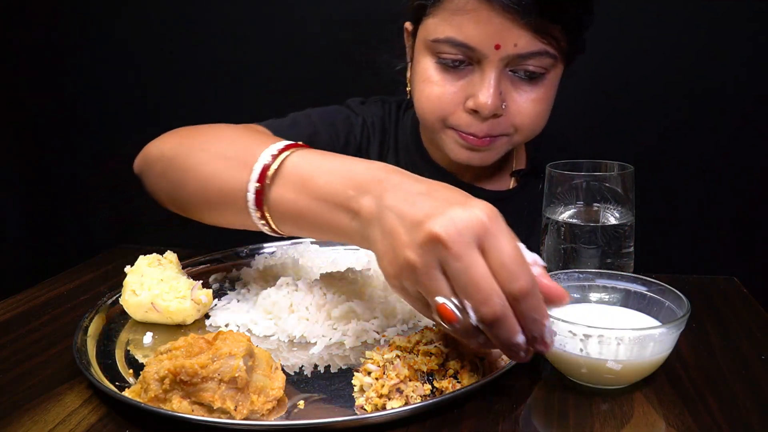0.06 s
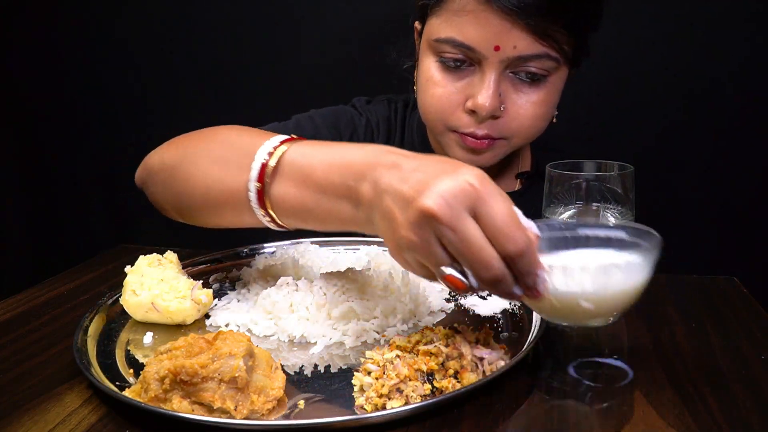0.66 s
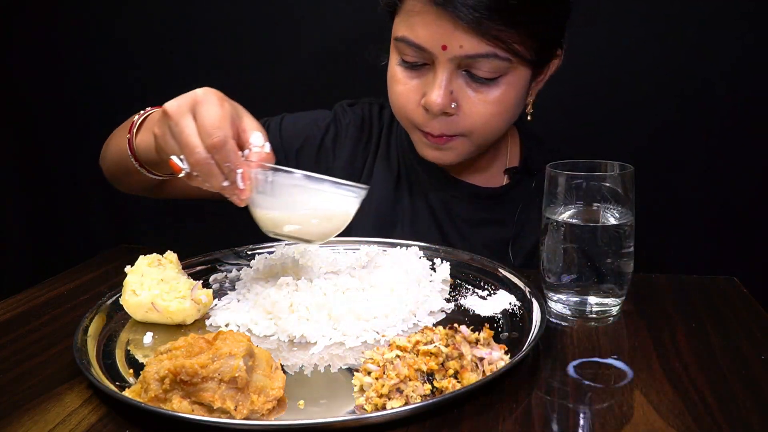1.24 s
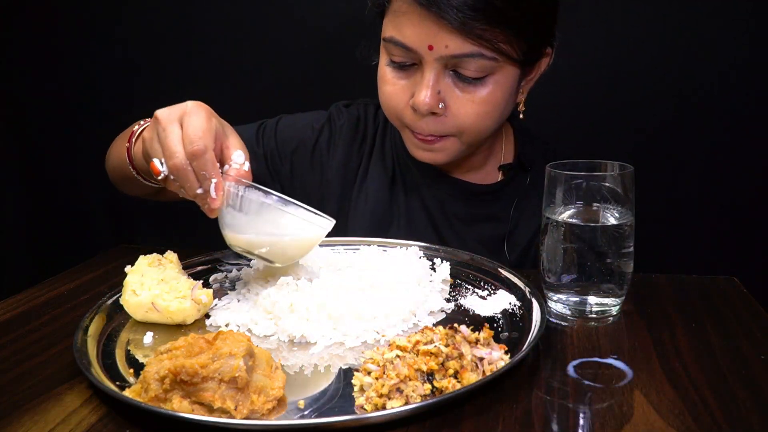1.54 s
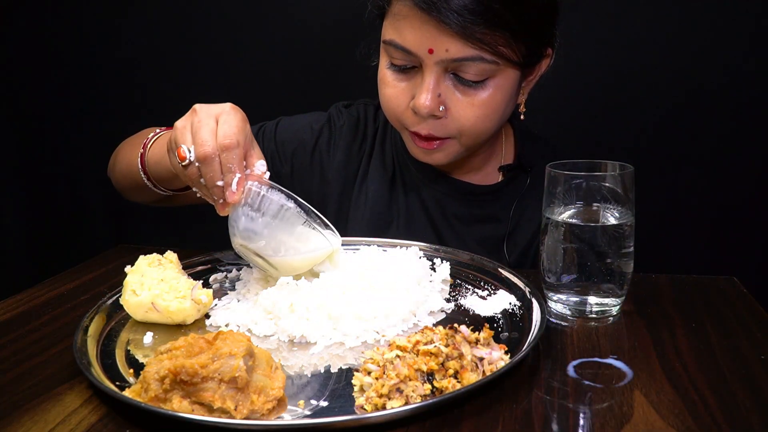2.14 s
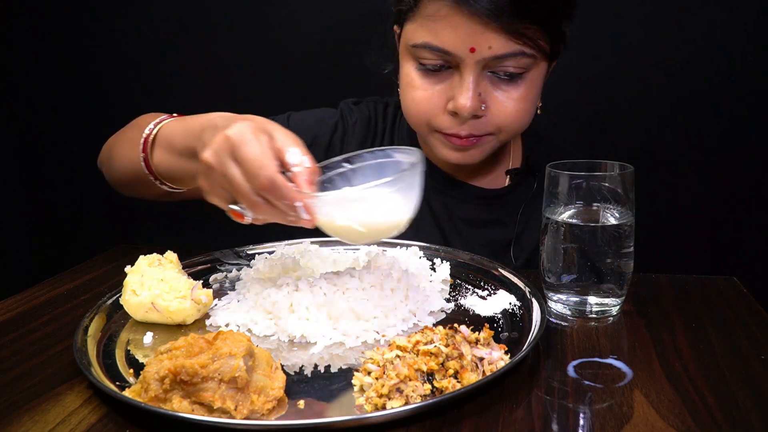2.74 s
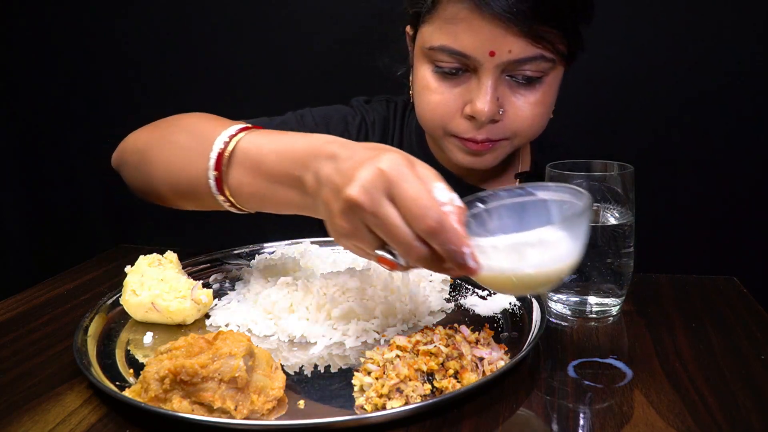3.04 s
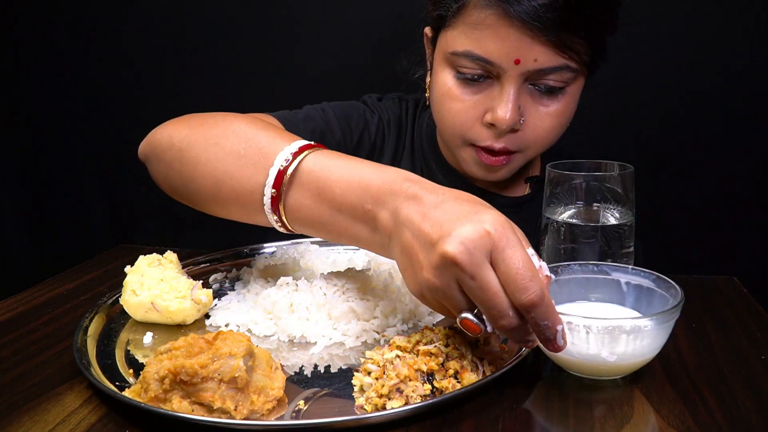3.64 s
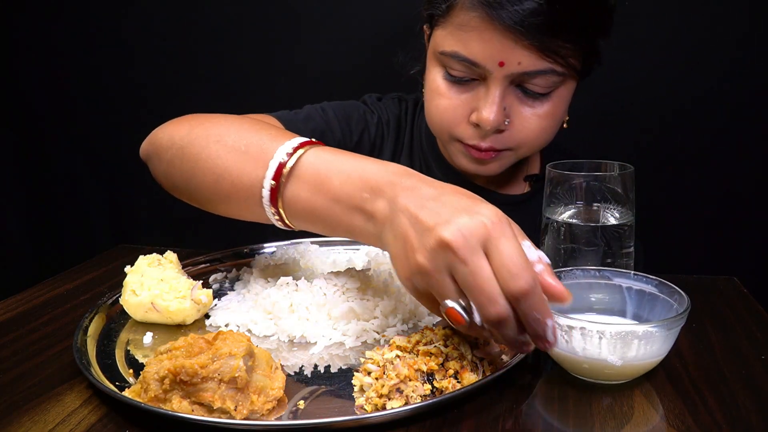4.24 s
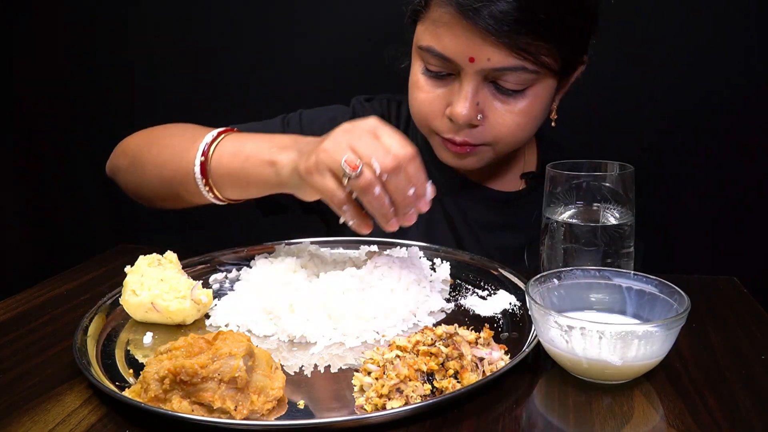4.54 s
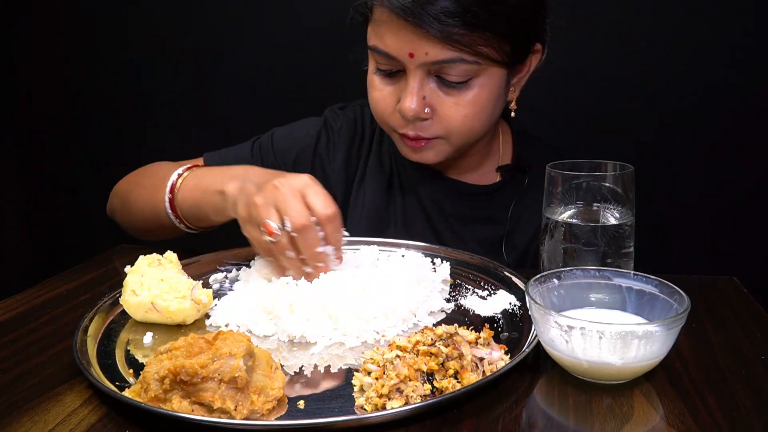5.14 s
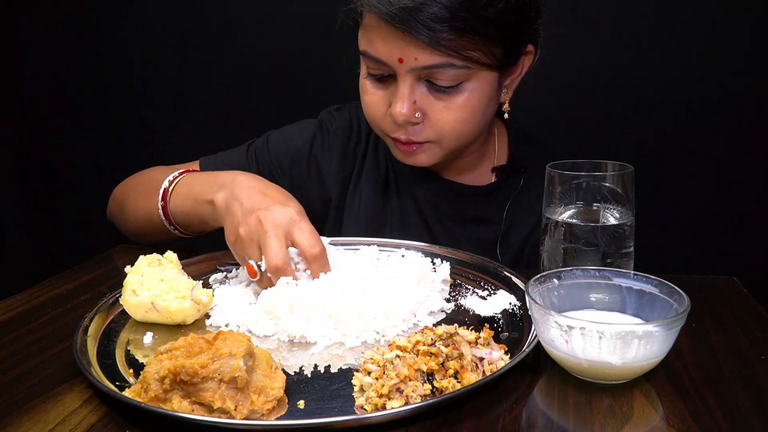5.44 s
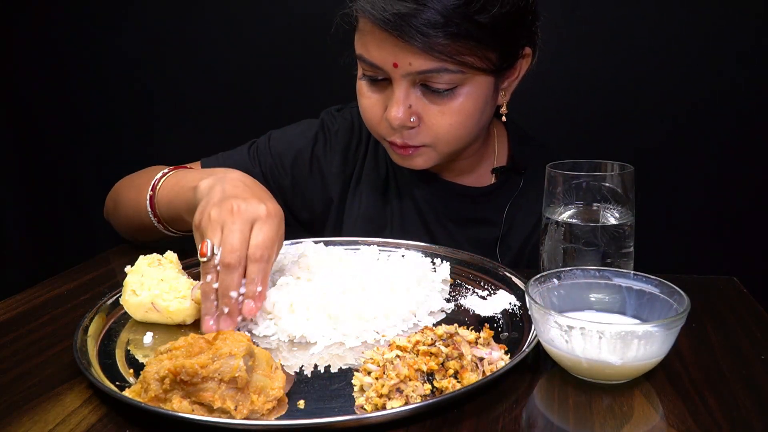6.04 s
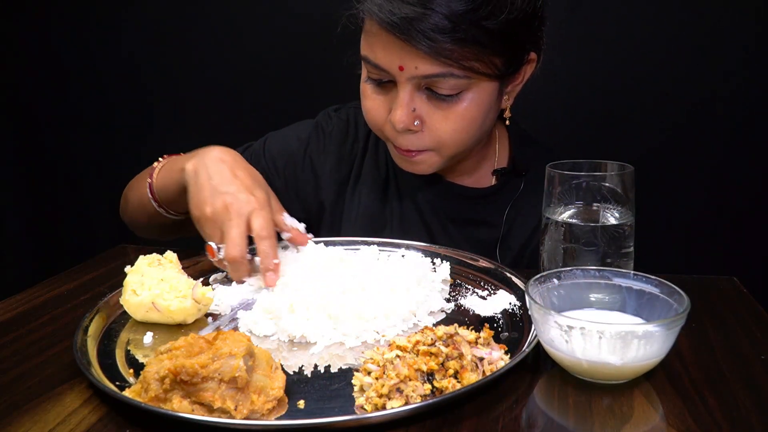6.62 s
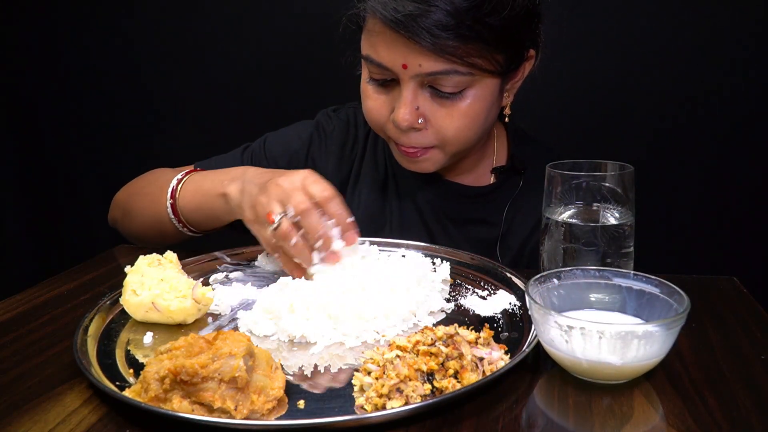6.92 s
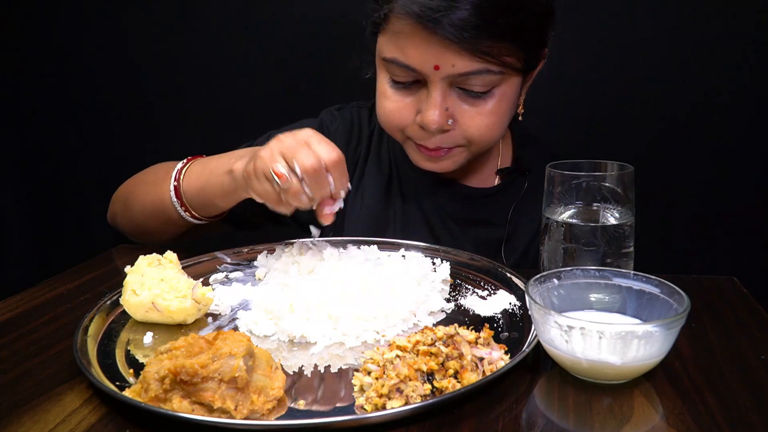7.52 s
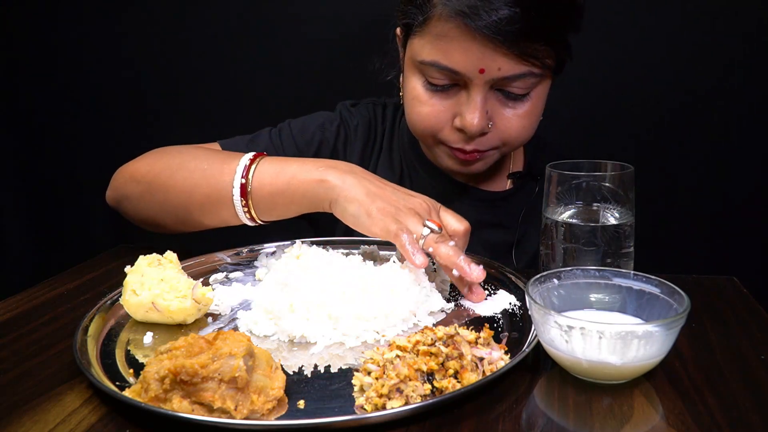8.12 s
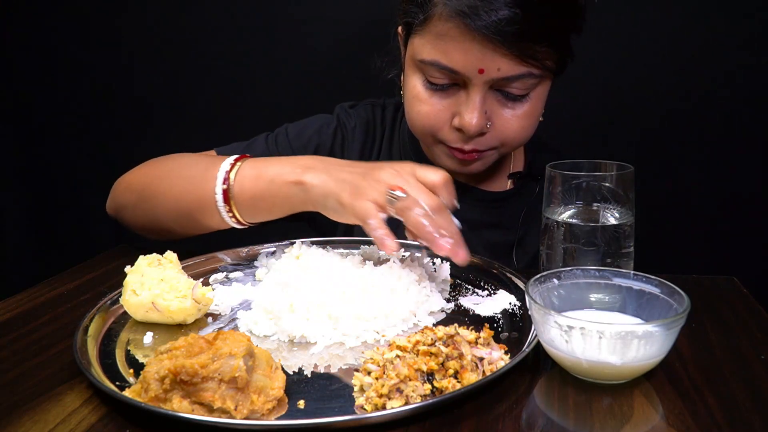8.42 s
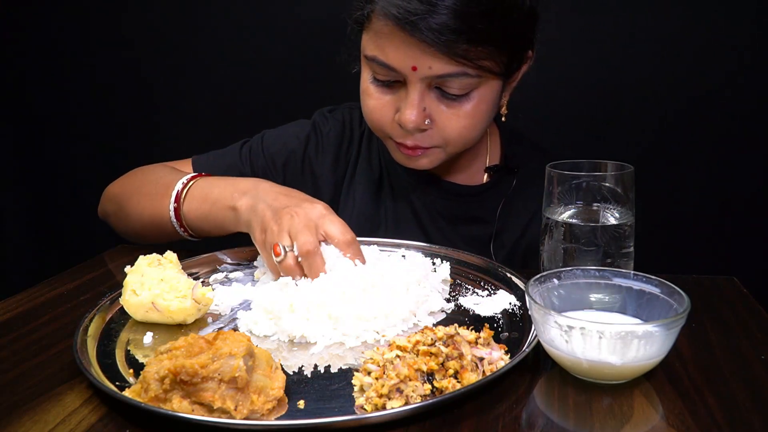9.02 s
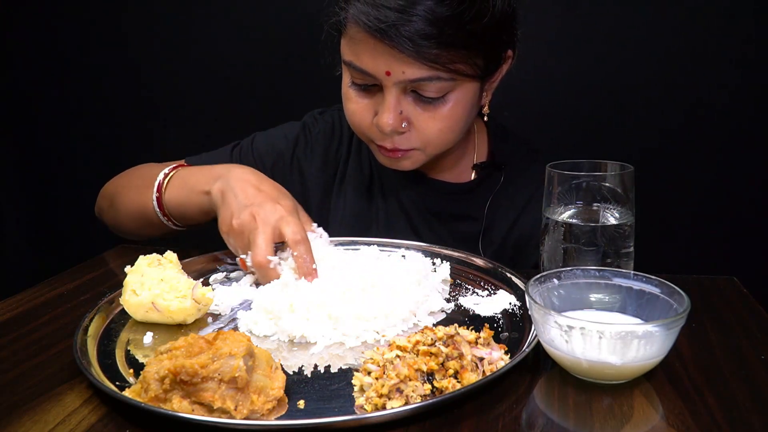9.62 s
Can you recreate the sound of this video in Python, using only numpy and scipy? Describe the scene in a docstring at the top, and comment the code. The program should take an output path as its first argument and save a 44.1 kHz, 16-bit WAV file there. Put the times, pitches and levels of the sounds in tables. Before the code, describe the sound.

A steady low motor hum fills a small room, heard through one close microphone. In the first second there are a few soft bumps and scuffs as a glass bowl is picked up from a wooden table. From about 1.8 to 2.8 seconds, milk drips onto boiled rice with small wet pops and one dull bump. At 3.4 seconds the bowl lands on the table with a sharp, briefly ringing knock, the loudest sound. It slides with a faint squeak and settles with duller knocks around 3.9 to 4.1 seconds. From about 4.9 seconds until nearly 10, fingers squeeze the wet rice on a steel plate in short, irregular presses, giving quiet squishes, sticky crackles and tiny pops. Light brushes and soft bumps come around 6.2, 6.6 and 7.5 seconds. The squeezing thins out near 8 seconds, then picks up again.

```python
"""Milk and rice mixed by hand

One close microphone at a wooden table in a small room. Milk drips from a glass bowl onto boiled rice
on a steel plate; the bowl is knocked back down, ringing and sliding, and a limiter ducks the sound
after the knocks. Fingers brush the plate and squeeze the wet rice in short presses: it mashes,
crackles and pops with the pressure. Motors hum behind it all."""
import sys
import numpy as np
from scipy import signal
from scipy.fft import rfft, irfft, next_fast_len
from scipy.io import wavfile
from scipy.ndimage import uniform_filter1d, map_coordinates

SR = 44100
rng = np.random.default_rng(int(sys.argv[2]) if len(sys.argv) > 2 else 0)


def transcribe(signal):
    """Save signal, clipped to [-1, 1], as a 16-bit WAV file at the path in sys.argv[1]."""
    frames = np.atleast_2d(signal).T
    limited = np.clip(frames, -1, 1)
    pcm = np.round(limited * 32767).astype(np.int16)
    wavfile.write(sys.argv[1], SR, pcm)


N = 435266
TOP_HZ = 15850  # the recorder's band limit

# finger presses into the rice: t/s, length/s, relative mash level/dB, crackle offset/dB
SQUEEZES = [(4.91, .12, -55, -4.5), (5.19, .08, -52, -3), (5.33, 0.143, -55, -6), (5.54, 0.0283, -56, -2.5),
            (5.625, 0.098, -56, 2), (6.185, 0.059, -51.5, -3.5), (6.28, 0.077, -57, -5),
            (6.56, .03, -47.5, -4.5), (6.69, 0.178, -56, -1), (7.10, 0.0296, -57, 6),
            (7.165, 0.0867, -51, -2.5), (7.32, .13, -54.5, -4), (8.15, .035, -47, 0),
            (8.665, 0.038, -65, 11), (8.94, .14, -52, -4.5), (9.095, .11, -53, 0), (9.25, .12, -54, -1.5),
            (9.62, 0.0905, -55, -1.5), (9.78, 0.05766, -53.5, -6.5)]


def rice():
    """Squeezed rice mashes in the middle register and crackles above it, following the pressure."""
    # tone of the crackle and of the mash: f/Hz, relative level/dB
    crackle_spectrum = [(1500, -21.5), (4000, -5.5), (6500, -2), (9500, 0.5), (12000, -3), (16000, -9.5)]
    mash_spectrum = [(400, -1), (1200, -2.5), (2200, -4.5), (4000, 1), (6500, -7), (12000, -30)]
    mash_gain, crackle_gain = amp(-66), amp(-68)  # rice clings to the fingers between squeezes
    for s, length, db, sticky_db in SQUEEZES:
        push = amp(db) * pressure(s, length)
        mash_gain = np.maximum(mash_gain, push)
        crackle_gain = np.maximum(crackle_gain, amp(sticky_db) * push)
    mash_db, crackle_db = 20 * np.log10(mash_gain), 20 * np.log10(crackle_gain)
    fine = grains(crackle_db, rate=1500, centre_hz=7236, cycles=2.5, spread_db=5.0)
    coarse = grains(mash_db, rate=1700, centre_hz=2490, cycles=1.5, spread_db=4.0)
    crackle = amp(crackle_db - 1.5) * coloured(fine, crackle_spectrum)
    mash = amp(mash_db - 2.5) * coloured(coarse, mash_spectrum)
    hand_in_rice = clock(N) > 4.75
    return hand_in_rice * (crackle + mash)


def pressure(s, length, press_s=.018, release_s=.025):
    """Finger pressure of one squeeze, 0-1: press, hold, relax."""
    t = clock(N) - s
    return np.clip(t / press_s, 0, 1) * np.exp(-np.maximum(t - length, 0) / release_s)


def grains(level_db, rate, centre_hz, cycles, spread_db):
    """Tiny damped rings of sticky rice parting, at rms 1; harder kneading makes more of them."""
    density = rate * np.clip(amp(level_db - level_db.max()), .05, 1)
    starts = np.flatnonzero(rng.random(N) < density / SR)
    hz = np.minimum(centre_hz * np.exp(0.403 * rng.standard_normal((len(starts), 1))), TOP_HZ)
    size_db = spread_db * np.minimum(rng.exponential(size=(len(starts), 1)), 3)
    size = amp(size_db) / np.sqrt(density[starts, None])  # equal power at any density
    t = clock(256)
    rings = size * np.sin(2 * np.pi * hz * t) * np.exp(-t * hz / cycles) * (1 - np.exp(-t * hz))
    positions = starts[:, None] + np.arange(len(t))
    return unit(np.bincount(positions.ravel(), rings.ravel(), N)[:N])


def pops():
    """A few clear pops, and small ones at random moments of the pour and the squeezes."""
    # wet films and bubbles bursting: t/s, relative level/dB, starting f/Hz, t60/s
    clear_pops = [(1.018, -32.5, 3220, 0.0045), (1.812, -28, 7990, .01), (1.816, -28.5, 5960, 0.0058),
                  (2.248, -39, 10400, .008), (2.315, -35, 4000, 0.012), (2.350, -27, 2040, 0.0267),
                  (2.357, -46, 3425, 0.026), (2.3957, -35.5, 3864, 0.0177), (2.816, -40.5, 5270, 0.012),
                  (3.347, -43.5, 4980, 0.0267), (3.842, -38, 3020, 0.014), (5.0215, -39, 3450, 0.019),
                  (5.210, -37, 6590, 0.012), (5.257, -37, 1800, .016), (5.268, -34, 3710, 0.0116),
                  (5.547, -35.5, 4390, .007), (5.679, -40, 7710, 0.0065), (6.3376, -40, 4800, 0.009),
                  (6.572, -35, 4010, 0.0062), (6.829, -37, 4300, 0.01), (7.337, -29, 2057, 0.0076),
                  (8.956, -35.5, 2900, 0.00623), (9.254, -32, 2212, 0.0083), (9.7918, -26, 2900, 0.00474),
                  (9.806, -27.5, 3810, 0.0137)]
    out = np.zeros(N)
    for s, db, hz, t60 in clear_pops:
        add(out, s, pop(db, hz, t60))
    pour_start_s, pour_length_s, drips_per_s, pops_per_s = 2.08, .48, 22, 5
    wet_spells = [(pour_start_s, pour_length_s, drips_per_s)]
    wet_spells += [(s, length, pops_per_s) for s, length, _, _ in SQUEEZES]
    for s, length, rate in wet_spells:
        for _ in range(rng.poisson(rate * length)):
            hz = min(5300 * 2 ** rng.normal(0, 0.617), TOP_HZ)
            add(out, s + length * rng.random(), pop(db=rng.normal(-42.5, 2.2), hz=hz, t60=0.0092))
    return out


def pop(db, hz, t60):
    """A wet film snaps and its little cavity rings, rising in pitch as it opens."""
    t = clock(SR // 16)
    pitch = hz * (1 + 0.153 * np.minimum(t / t60, 1))
    ring = np.sin(2 * np.pi * np.cumsum(pitch) / SR) * fade(t, t60) * (1 - np.exp(-t / .0004))
    snap = amp(-4.5) * hump(rng.standard_normal(len(t)), hz, q=1.35) * fade(t, 0.0071)
    return amp(db + 1.0) * (ring + snap)


def bowl_knocks():
    """Each contact thuds in the wood and rings the glass; a softer one dulls the high modes."""
    # bowl meets table: t/s, relative glass level/dB, cut-off f/Hz, relative thud level/dB, thud f/Hz
    knocks = [(3.4294, 1, 9000, -10.5, 1528), (3.9170, -8.5, 1180, -5, 1094), (3.9190, -11.5, 1000, 1, 901),
              (4.0613, -21, 1500, -21, 700), (4.0732, -13, 1090, -7, 720), (4.0767, -28, 900, -13.5, 1410),
              (4.1220, -26.5, 4000, -30.5, 1780)]
    # modes of the bowl on the table, the last few ringing on: f/Hz, relative level/dB, t60/s
    glass_modes = [(193, -27, 0.1), (305, -26.5, 0.0376), (412, -21.5, .045), (613.6, -15.5, 0.026),
                   (783, -19, 0.031), (976.7, -14.5, 0.045), (1226, -16, 0.031), (1410, -24, 0.044),
                   (1737, -16, 0.027), (2053, -14, 0.0208), (2338.5, -15, 0.019), (2740, -27, 0.016),
                   (3140, -16, 0.011), (3560, -25, 0.013), (4430, -31, 0.026), (5230, -27, 0.0285),
                   (5690, -28, 0.03), (6460, -39, .015), (7737, -27, 0.0183), (9116.4, -28, 0.0215),
                   (10100, -24, 0.0256), (11500, -29, 0.015), (12750, -36, .02), (14900, -32.5, .025),
                   (1193, -29.5, 0.35), (1720, -31.5, 0.3), (2022, -33.5, 0.34), (2350, -38, 0.29)]
    # the first instant of a contact: f/Hz, relative level/dB
    crack_spectrum = [(100, -8), (300, 5.5), (2400, 5.5), (4000, -9.5), (6500, -19), (11000, -18),
                      (16000, -28.5)]
    out, t = np.zeros(N), clock(SR * 3 // 4)
    for s, glass_db, cut_hz, thud_db, thud_hz in knocks:
        ring = sum((-1) ** k * amp(db + rng.normal(0, 1)) * fade(t, t60) * np.sin(2 * np.pi * hz * t)
                   for k, (hz, db, t60) in enumerate(glass_modes))
        crack = amp(-10.0) * coloured(rng.standard_normal(len(t)), crack_spectrum) * fade(t, 0.034)
        glass = amp(glass_db) * filtered(ring + crack, lambda f: 1 / (1 + 1j * f / cut_hz))
        thud = amp(thud_db) * np.sin(2 * np.pi * thud_hz * t) * fade(t, 0.0091)
        add(out, s, reflections(glass + thud, early_db=-7, late_db=-10.0, early_t60=0.038))
    return amp(4) * out


def bowl_slide():
    """The glass foot sticks and slips on the table, singing just before it settles."""
    # course of the squeak: t/s, f/Hz, level/dB
    squeak = [(3.7, 752, -73), (3.78, 780, -50.5), (3.85, 804.5, -56.5), (3.91, 818, -40), (3.93, 825, -80)]
    t = clock(N)
    times, pitches, levels = np.transpose(squeak)
    hz, db = np.interp(t, times, pitches), np.interp(t, times, levels)
    sliding = (t > times[0]) & (t < times[-1])
    return sliding * amp(db) * np.sin(2 * np.pi * np.cumsum(hz) / SR + .5 * wobble(60))


def bumps():
    """Soft contacts give a short, dull knock and a dry scuff."""
    # bumps on the table and plate: t/s, relative level/dB, f/Hz
    contacts = [(0.042, -34.5, 660), (0.358, -34, 880), (0.388, -29, 1000), (0.737, -33.5, 746),
                (0.873, -38.5, 1590), (0.916, -35.5, 1180), (1.063, -40, 1090), (2.631, -28.5, 520),
                (4.344, -34, 493), (6.572, -32.5, 569.4), (7.470, -31, 540)]
    out, t = np.zeros(N), clock(SR // 8)
    for s, db, hz in contacts:
        knock = np.sin(2 * np.pi * hz * t) * fade(t, 9 / hz)
        scuff = amp(-8.0) * hump(rng.standard_normal(len(t)), hz, q=0.97) * fade(t, 0.029)
        add(out, s, amp(db + 6.5) * (knock + scuff) * (1 - np.exp(-t / 0.00088)))
    return out


def brushes():
    """Short strokes of grainy friction that swell and fade; soft skin dulls their top."""
    # hand and bowl brush the table and plate: middle t/s, length/s, level/dB, centre f/Hz
    strokes = [(0.045, 0.11, -47, 393), (0.054, 0.078, -56.5, 3530), (0.294, 0.062, -52.5, 1380),
               (0.388, 0.052, -43.5, 1150), (0.915, 0.12, -60.5, 1880), (1.838, 0.045, -57.5, 6460),
               (6.218, 0.055, -49, 758), (6.592, 0.026, -47, 1040)]
    out = np.zeros(N)
    for s, length, db, hz in strokes:
        start = max(s - 2 * length, 0)
        t = start + clock(SR // 2)
        swell = np.exp(-2 * ((t - s) / length) ** 2)
        grit = rng.standard_normal(len(t)) * (rng.random(len(t)) < .06)
        grit = filtered(grit, lambda f: 1 / np.sqrt(1 + (f / 11500) ** 8))
        add(out, start, amp(db) * swell * hump(grit, hz, q=0.74))
    return out


def reflections(x, early_db, late_db, early_t60):
    """The direct sound, a quick scatter off table and plate, and a longer answer from the walls."""
    # decay of the small room: f/Hz, t60/s
    room_decay = [(150, 0.32), (500, 0.454), (1200, 0.45), (2500, 0.417), (5000, 0.43), (10000, 0.26),
                  (16000, 0.16)]
    # what the walls send back: f/Hz, relative level/dB
    wall_spectrum = [(100, -8), (400, 4), (1200, -3), (2400, -6.5), (5000, -5.5), (9000, -6), (16000, -14)]
    hz, frame_s, noise = signal.stft(rng.standard_normal(SR // 2), SR, nperseg=256)
    decay = fade(frame_s, along(room_decay, hz)[:, None])
    late = signal.istft(noise * decay * amp(along(wall_spectrum, hz))[:, None], SR, nperseg=256)[1]
    t = clock(len(late))
    late *= 1 - np.exp(-t / 0.0028)
    early = rng.standard_normal(len(t)) * fade(t, early_t60) * (1 - np.exp(-t / 0.0025))
    tail = amp(early_db) * early / np.linalg.norm(early) + amp(late_db) * late / np.linalg.norm(late)
    return x + signal.fftconvolve(x, tail)[:len(x)]


def room_tone():
    """Two motors at slightly different speeds beat against each other over the room's steady noise."""
    # motor hum: f/Hz, rms level/dB, phase drift/rad
    motor_tones = [(46.8, -53, 0.14), (50.2, -39.5, 0.132), (61.77, -49.5, 2.3), (68, -43.5, 1.3),
                   (74.7, -53, 0.11), (94.8, -42, 0.019), (99.956, -35.5, 0.26), (107.6, -50, 0.26),
                   (119.25, -59.5, 1.1), (147.9, -53, 0.31), (166, -58.5, .6)]
    # low rumble and broad room noise: f/Hz, relative level/dB
    rumble_spectrum = [(8, -21), (24, -15), (45, 0), (64, -4), (85, -8.5), (110, -7.5), (135, -16.5),
                       (220, -44), (500, -93.5)]
    air_spectrum = [(60, -3.5), (150, -6), (250, -8), (500, -13.5), (1000, -21), (2000, -27), (4000, -32.5),
                    (8000, -36.5), (12000, -40.5), (15800, -43.5)]
    t, hum = clock(N), np.zeros(N)
    for hz, db, drift in motor_tones:
        phase = 2 * np.pi * (hz * t + rng.random()) + drift * wobble(1.99)
        hum += amp(db) * np.sqrt(2) * np.sin(phase)
    rumble = amp(-41.0) * coloured(rng.standard_normal(N), rumble_spectrum)
    air = amp(-43.5) * coloured(rng.standard_normal(N), air_spectrum)
    return hum + rumble + air


def limiter(x, ceiling, release_s):
    """Peaks over the ceiling pull the gain down at once; it then creeps back."""
    excess = np.log(np.maximum(abs(x) / ceiling, 1))
    leak = np.exp(clock(N) / release_s)
    held = np.maximum.accumulate(excess * leak) / leak
    return x * np.exp(-uniform_filter1d(held, size=16))


def amp(db):
    """Decibels to gain."""
    return 10 ** (np.asarray(db) / 20)


def unit(x):
    """Scale to rms 1."""
    return x / np.sqrt(np.mean(x ** 2) + 1e-20)


def clock(count):
    """Sample times in seconds."""
    return np.arange(count) / SR


def fade(t, t60):
    """Exponential decay, 60 dB down at t60."""
    return np.exp(-np.log(1000) * t / t60)


def wobble(rate):
    """A smooth random curve, rate knots a second."""
    return map_coordinates(rng.standard_normal(int(N * rate / SR) + 4), [clock(N) * rate])


def along(points, hz):
    """Interpolate (f/Hz, value) points on a log frequency axis."""
    f, values = np.transpose(points)
    return np.interp(np.log(hz + 1), np.log(f + 1), values)


def filtered(x, response):
    """x through a frequency response."""
    size = next_fast_len(len(x) + SR // 4)
    return irfft(rfft(x, size) * response(np.fft.rfftfreq(size, 1 / SR)), size)[:len(x)]


def coloured(x, spectrum):
    """x shaped by (f/Hz, level/dB) points, at rms 1."""
    return unit(filtered(x, lambda hz: amp(along(spectrum, hz))))


def hump(x, hz, q):
    """x through a broad resonance with steep skirts, at rms 1."""
    return unit(filtered(x, lambda f: (1j * f * hz / (hz ** 2 - f * f + 1j * f * hz / q)) ** 2))


def add(track, s, sound):
    """Mix a sound into the track at time s."""
    part = track[max(round(s * SR), 0):][:len(sound)]
    part += sound[:len(part)]


def scene():
    """Table and room as they reach one close microphone."""
    handling = rice() + pops() + bumps() + brushes() + bowl_slide()
    handling = reflections(handling, early_db=-7.0, late_db=-15.5, early_t60=0.018)
    return (room_tone() + bowl_knocks() + handling)[None]


def record(dry):
    """The recorder limits the knocks and keeps nothing above its band limit."""
    limited = limiter(dry[0], ceiling=0.88, release_s=0.53)
    return filtered(limited, lambda hz: hz < TOP_HZ)[None]


dry = scene()
out = record(dry)
transcribe(out)
```